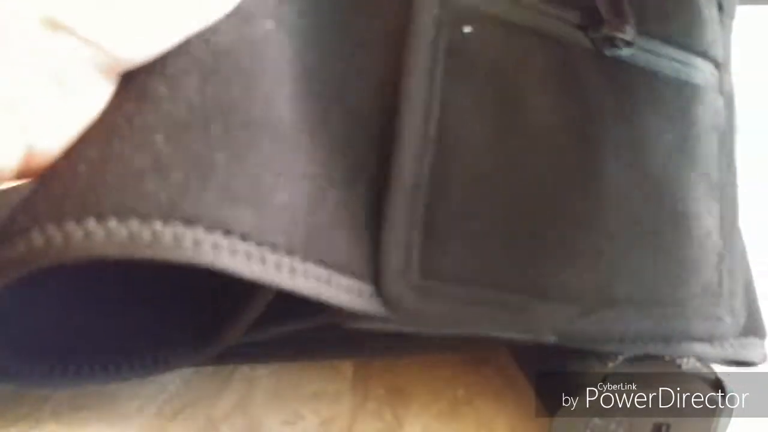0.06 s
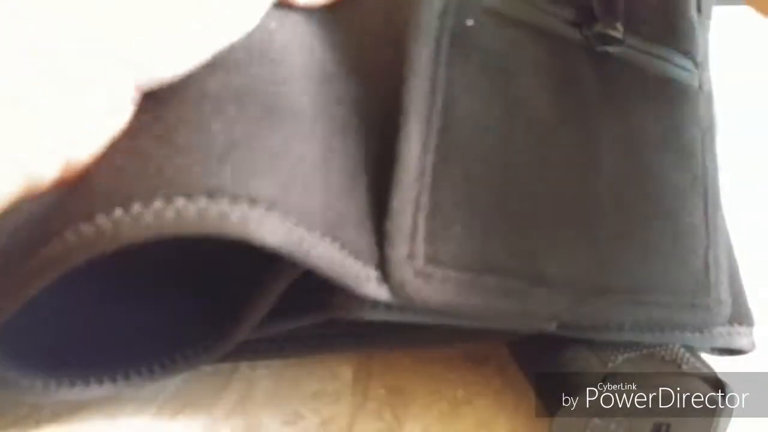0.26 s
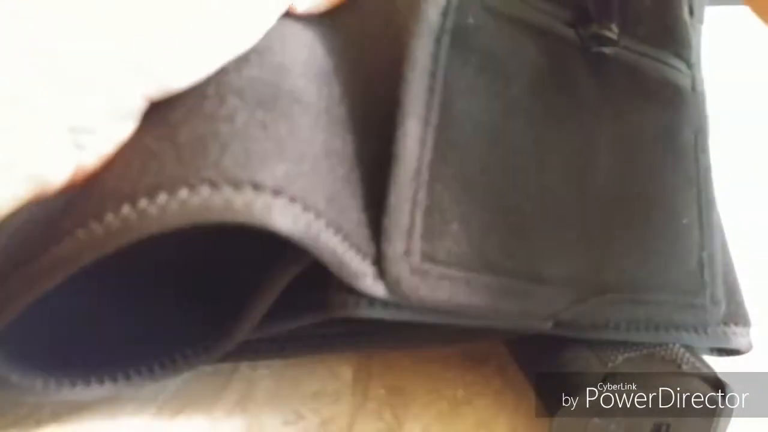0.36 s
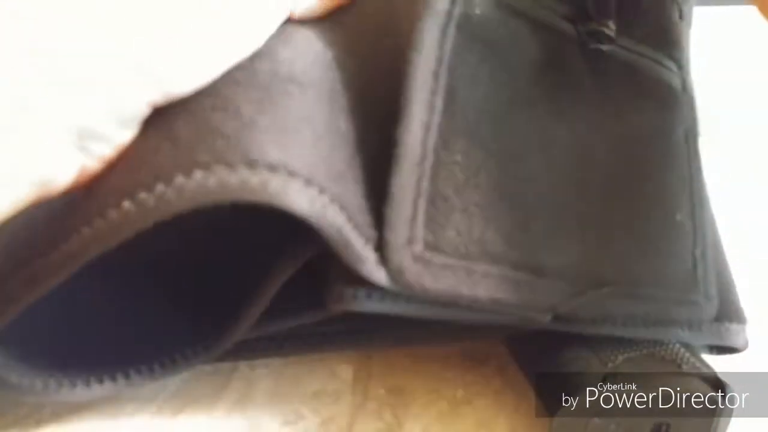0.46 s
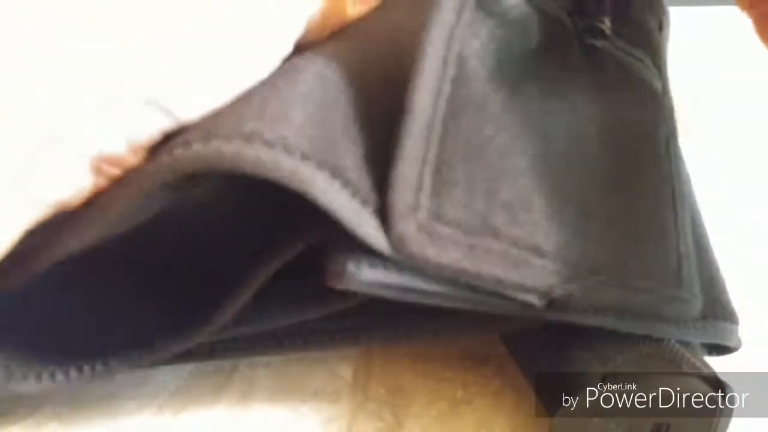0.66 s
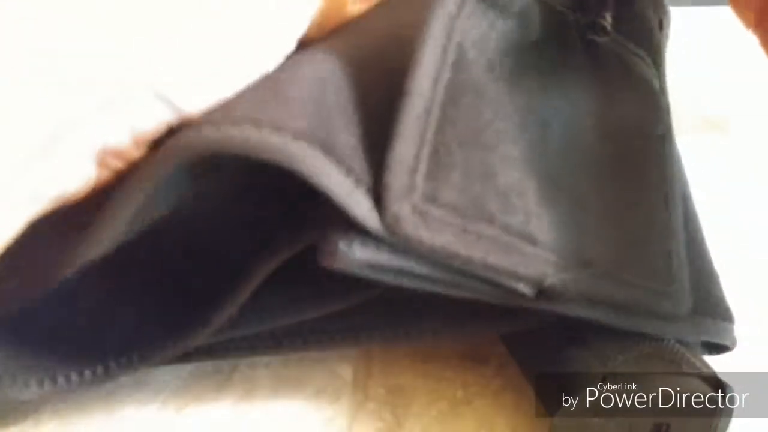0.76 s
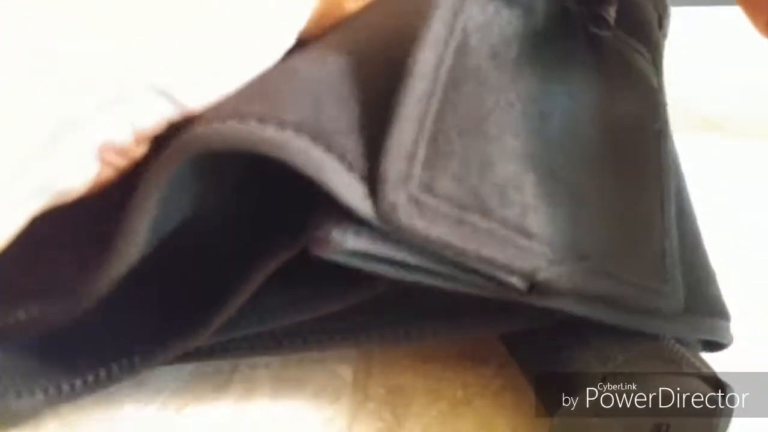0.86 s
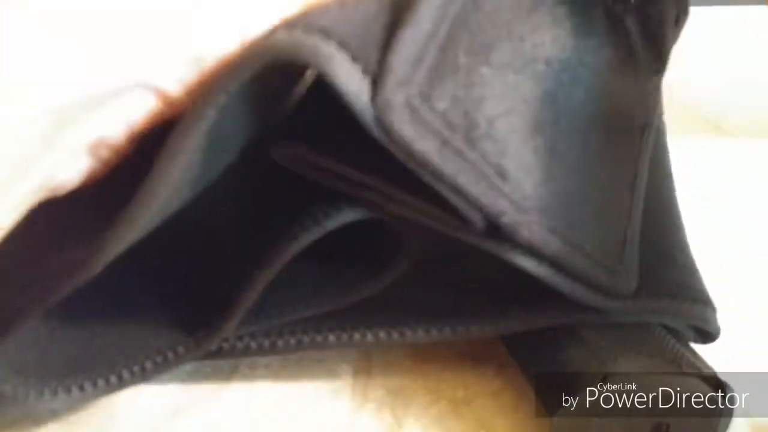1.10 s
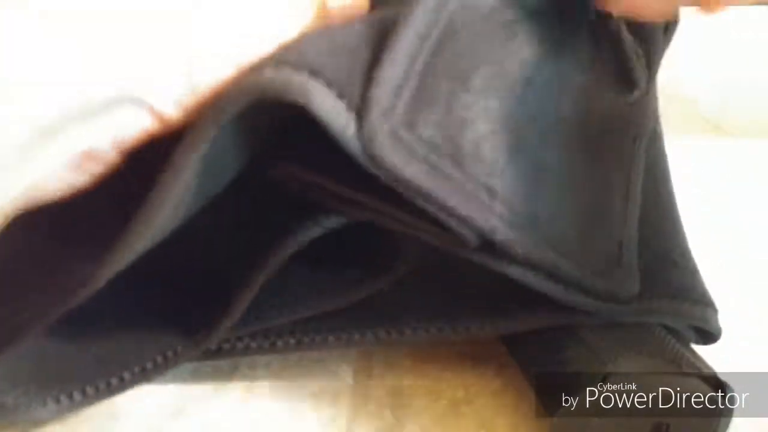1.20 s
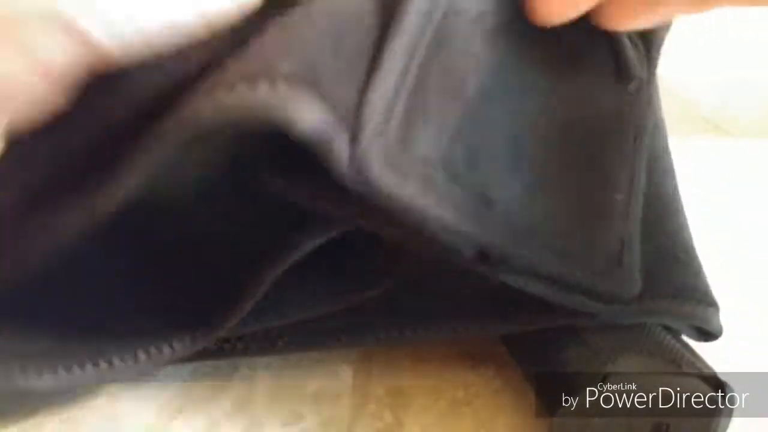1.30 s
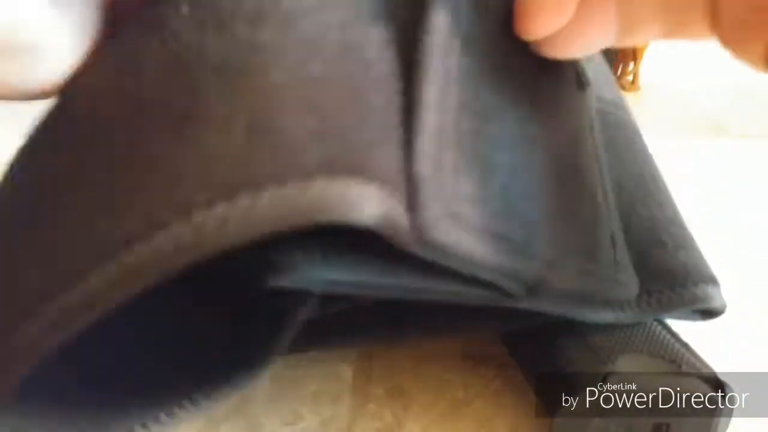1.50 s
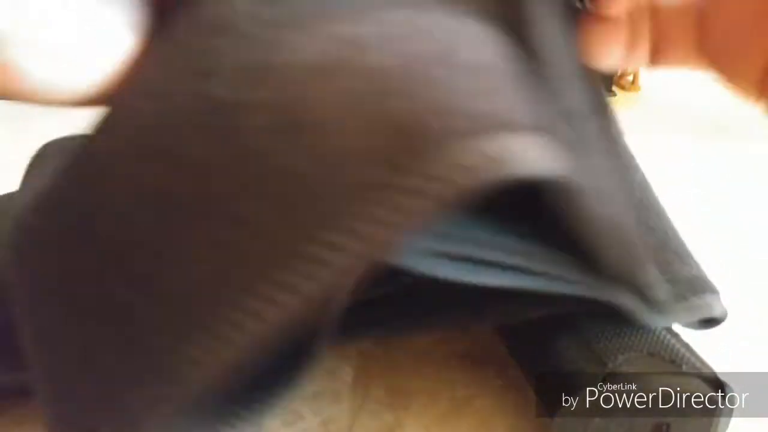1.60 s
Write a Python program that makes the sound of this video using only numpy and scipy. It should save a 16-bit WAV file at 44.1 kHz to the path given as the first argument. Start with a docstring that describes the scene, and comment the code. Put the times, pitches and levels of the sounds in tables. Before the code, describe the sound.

Loud crackling rip of a hook-and-loop strap peeled apart, then brief soft cloth rustling.

```python
"""A hook-and-loop strip on a padded fabric belt is peeled open indoors, close to a small stereo camera.
Thousands of hooks let go as short ringing noise bursts that jolt the stiff backing; louder snaps stand out.
Cloth rustles before and after as grainy coloured noise, a seam scrapes in narrow noise bands,
soft thuds ring the padding as decaying sines, and handling rumbles under them.
A decaying noise tail makes the room; a steady noise floor lies behind it all."""
import sys
import numpy as np
from scipy import signal
from scipy.fft import rfft, irfft, next_fast_len
from scipy.io import wavfile
from scipy.ndimage import map_coordinates

SR = 44100
rng = np.random.default_rng(int(sys.argv[2]) if len(sys.argv) > 2 else 0)


def pcm_store(signal):
    """Save signal as 16-bit PCM."""
    levels = np.round(np.clip(np.atleast_2d(signal), -1, 1) * 32767)
    wavfile.write(sys.argv[1], SR, levels.astype(np.int16).T)


def volts_from_decibels(level):
    """Turn decibel levels (scalar or array-like) into linear amplitude factors."""
    exponent = np.asarray(level, float) / 20
    return 10 ** exponent


N = 72765  # length in samples

# the right microphone hears later, by a fixed lag and a random spread per grain
LAG_S, LAG_SPREAD_S = 0.00015, 0.00009
# share of noise power that is independent at each microphone
UNALIKE, BACKING_UNALIKE = 0.52, 0.079


def unit(x):
    """Scale to rms 1."""
    return x / np.sqrt(np.mean(x ** 2) + 1e-20)


def along(points, hz):
    """Interpolate (frequency, value) points on a log frequency axis."""
    f, v = np.transpose(points)
    return np.interp(np.log(hz + 1), np.log(f + 1), v)


def curve(rows, column=1):
    """One table value per sample; -120 dB outside the table."""
    rows = np.array(rows)
    return np.interp(np.arange(N) / SR, rows[:, 0], rows[:, column], left=-120, right=-120)


def wobble(rate):
    """A smooth random curve with rate knots a second."""
    knots = rng.standard_normal(1000)
    return map_coordinates(knots, [np.clip(np.arange(N) * rate / SR, 0, 998)])


def coloured(x, spectrum):
    """Causal (minimum-phase) colour that keeps the rms of white noise; steep below the first point."""
    m = 2 * next_fast_len(N // 2 + 4096)
    hz = np.fft.rfftfreq(m, 1 / SR)
    low_cut = np.clip(hz / spectrum[0][0], 0, 1) ** 4
    gain = volts_from_decibels(along(spectrum, hz)) * low_cut
    # folding the cepstrum onto positive times gives the minimum phase
    cepstrum = irfft(np.log(unit(gain) + 1e-5), m)
    cepstrum[1:m // 2] *= 2
    cepstrum[m // 2 + 1:] = 0
    response = np.exp(rfft(cepstrum))
    return irfft(rfft(x, m) * response, m)[..., :N]


def scatter(s, shapes, pan_db, lag):
    """Place one stereo grain per row: pan_db lowers the left once and the right twice, the right lags."""
    out = []
    for side, start in enumerate((s, s + LAG_S + LAG_SPREAD_S * lag)):
        at = np.round(start * SR).astype(int)[:, None] + np.arange(shapes.shape[-1])
        grains = shapes[side] * volts_from_decibels((-1.0 - side) * pan_db)[:, None]
        out.append(np.bincount(np.clip(at, 0, N).ravel(), grains.ravel(), N + 1)[:N])
    return np.array(out)


def bursts(count, size, t60, unalike):
    """Dying noise bursts that mix a part shared by both microphones with a part of each one's own."""
    shared, left, right = np.moveaxis(rng.standard_normal((count, 3, size)), 1, 0)
    own_share = np.clip(unalike, 0, 1)
    noise = np.sqrt(1 - own_share) * shared + np.sqrt(own_share) * np.array([left, right])
    return noise * volts_from_decibels(-60 * np.arange(size) / SR / t60)


# the peel, close to the microphones: (time [s], hook level [dB], backing level over hooks [dB])
PEELING = [(0.08, -56, -21), (0.092, -43, -27), (0.106, -68, -35), (0.122, -27.5, -24), (0.156, -35.5, -14),
           (0.168, -24.5, -8), (0.178, -33, -35), (0.2, -37.5, -2.5), (0.212, -21, -6.5), (0.246, -26, -25),
           (0.27, -22.5, -16), (0.284, -33.5, -30), (0.31, -13.5, -10), (0.338, -30.5, -44),
           (0.348, -9.5, -9), (0.376, -18.5, -19.5), (0.386, -8.5, -13), (0.422, -44.5, -39),
           (0.434, -22.5, -20), (0.46, -20.5, -13.5), (0.468, -14.5, -16.5), (0.478, -22.5, -46),
           (0.49, -14.5, -13.5), (0.512, -17.5, -14.5), (0.608, -12.5, -16.5), (0.644, -19, -27),
           (0.658, -13.5, -15.5), (0.67, -17, -38), (0.688, -20, -32), (0.704, -25.5, -19),
           (0.738, -14, -21), (0.762, -27.5, -26), (0.8, -18, -41), (0.822, -35, -2), (0.828, -19, -31),
           (0.886, -25, -26), (0.896, -20.5, -19), (0.904, -22, -32), (0.908, -24, -21), (0.972, -9.5, -22),
           (0.978, -11.5, -22), (1.022, -6.5, -10), (1.044, -18.5, -44), (1.08, -31, -15),
           (1.12, -29.5, -10), (1.134, -24.5, -19), (1.14, -36, -5), (1.152, -15, -28), (1.168, -68, -6),
           (1.186, -49, -10), (1.19, -49, -12)]
# colour of hooks letting go, for single snaps too: (frequency [Hz], density [dB per Hz])
CRACKLE_COLOUR = [(710, -41), (1200, -16), (1310, -15), (1410, -18.5), (1570, -17.5), (1990, -17),
                  (2380, -8), (3150, -8), (4070, -7.5), (4730, -8.5), (5100, -4), (6740, -9), (9010, 1),
                  (10800, -12.5), (11800, -8), (13700, -9), (15600, -11.5)]
# colour of the shaken stiff backing, for single snaps too: (frequency [Hz], density [dB per Hz])
BACKING_COLOUR = [(180, -60), (300, -17.5), (402, -9.5), (685, 2), (1270, -2), (1420, -3), (1690, 2.5),
                  (2000, 1), (2600, -4), (4400, -120)]
CANDIDATES_PER_S, DENSER = 4400, 0.65  # hooks before thinning; dB of density per dB of pull
HOOK_T60_S, HOOK_HZ, HOOK_OCTAVES = 0.0038, 5000, 1.1  # burst decay; median ring pitch and its spread
RING_Q, RING_DB = 3.5, 1.5
SIZE_SPREAD_DB, PAN_SPREAD_DB = 3.8, 0.5
CLUMP_DB, CLUMPS_PER_S = 1.2, 150  # random swell of the grain level


def hooks():
    """Each hook cracks at a pitch of its own and jolts the backing; a harder pull frees more of them."""
    count, level = round(CANDIDATES_PER_S * N / SR), curve(PEELING)
    s = rng.uniform(0, (N - 1) / SR, count)
    chance = rng.uniform(0, 1, count)
    size, pitch, pan, lag = rng.standard_normal((4, count))
    density = volts_from_decibels(DENSER * (level - level.max()))
    share = np.clip(density[(s * SR).astype(int)], 0.15, 1)
    t = np.arange(256) / SR
    hz = np.clip(HOOK_HZ * 2 ** (HOOK_OCTAVES * pitch), 400, 16000)[:, None]
    ring = volts_from_decibels(RING_DB) * np.sin(2 * np.pi * hz * t) * np.exp(-np.pi * hz * t / RING_Q)
    # thinned by chance; fewer hooks are made larger to hold the power
    freed = (chance < share) / np.sqrt(share)
    gain = (volts_from_decibels(SIZE_SPREAD_DB * np.clip(size, -2, 2)) * freed)[:, None]
    clumps = volts_from_decibels(CLUMP_DB * wobble(CLUMPS_PER_S))
    crack_grains = gain * (bursts(count, len(t), HOOK_T60_S, UNALIKE) + ring)
    jolt_grains = gain * bursts(count, len(t), HOOK_T60_S, BACKING_UNALIKE)
    cracks = unit(clumps * scatter(s, crack_grains, PAN_SPREAD_DB * pan, lag))
    jolts = unit(clumps * scatter(s, jolt_grains, 0 * pan, lag))
    backing_level = level + curve(PEELING, column=2)
    return coloured(cracks * volts_from_decibels(level), CRACKLE_COLOUR) + coloured(jolts * volts_from_decibels(backing_level), BACKING_COLOUR)


# loud single snaps, levels and centre as set before panning and colour:
# (time [s], crack peak level [dB], centre frequency [Hz], backing jolt level [dB])
SINGLE_SNAPS = [(0.0901, -18, 6000, -41.5), (0.1242, -19, 9560, -24), (0.1454, -31, 8800, -27.5),
                (0.166, -32, 9360, -24), (0.1794, -24.5, 9420, -35), (0.2114, -25, 9600, -38),
                (0.2204, -17, 8820, -25), (0.261, -14, 9400, -27), (0.2674, -7.5, 3570, -18),
                (0.2724, -26, 8870, -32), (0.2884, -15, 8060, -34), (0.3015, -4, 8880, -21),
                (0.3124, -11, 9110, -33), (0.3254, -9, 8850, -23), (0.3461, -12, 9080, -22),
                (0.3521, 1.5, 9300, -29), (0.3588, -3, 9200, -35), (0.3652, 0.5, 9400, -23),
                (0.3774, -4, 9200, -30), (0.3844, -8, 7650, -21), (0.3994, -5.5, 8750, -27),
                (0.4342, -4, 9400, -45), (0.4444, -5, 9050, -37), (0.4673, -6, 8900, -47),
                (0.4893, -3, 8970, -20), (0.5523, -6, 9360, -32), (0.5611, -5, 8500, -21),
                (0.5914, -1.5, 9200, -17.5), (0.6543, -28, 8900, -45), (0.6684, -5, 9130, -43),
                (0.6794, -8, 8940, -38), (0.7726, -6, 9040, -36), (0.7913, -6, 9200, -37),
                (0.7973, -9, 8940, -39), (0.8088, -8, 9000, -28.5), (0.8282, 0, 6740, -37),
                (0.835, -7, 9580, -34), (0.8939, -2, 9000, -42.5), (0.9111, -4, 9200, -44),
                (0.9257, 2.5, 9200, -41), (0.9338, -9, 8900, -38), (0.9532, 4.5, 9150, -32),
                (0.9689, 4, 9650, -21), (1.0374, 0, 9200, -37), (1.1019, -4, 3130, -42),
                (1.1244, -16, 9610, -35), (1.1338, -3, 8400, -36), (1.1464, -5, 5700, -33),
                (1.1514, -27, 8140, -44), (1.181, -15.5, 8200, -49), (1.2207, -22.5, 6310, -63),
                (1.2322, -11, 6600, -62), (1.2963, -32, 8660, -55), (1.4311, -24, 8960, -40.5),
                (1.504, -41, 9300, -55), (1.6103, -14, 4020, -40)]
SNAP_T60_S, SNAP_Q, SNAP_BROAD_DB = 0.008, 1.1, -16  # decay; resonance; broadband part
SNAP_PAN_DB = 2  # 2 dB down on the left, 4 dB on the right


def snaps():
    """Bunches of hooks that break free at once, each a noise burst with its own brightness."""
    s, db, hz, jolt_db = np.transpose(SINGLE_SNAPS)
    size, still = 900, np.zeros(len(s))
    f, centre = np.fft.rfftfreq(size, 1 / SR), hz[:, None]
    damping = 1j * f * centre / SNAP_Q
    resonance = (damping / (centre * centre - f * f + damping)) ** 2 + volts_from_decibels(SNAP_BROAD_DB)
    cracks = irfft(rfft(bursts(len(s), size, SNAP_T60_S, UNALIKE)) * resonance, size)
    peak = np.abs(cracks).max(axis=(0, 2))[:, None]
    cracks = cracks / peak * volts_from_decibels(db)[:, None]
    jolts = bursts(len(s), size, SNAP_T60_S, BACKING_UNALIKE) * volts_from_decibels(jolt_db)[:, None]
    cracks = scatter(s, cracks, still + SNAP_PAN_DB, still)
    jolts = scatter(s, jolts, still, still)
    return coloured(cracks, CRACKLE_COLOUR) + coloured(jolts, BACKING_COLOUR)


# belt cloth moving before and after the peel, one list each: (time [s], level [dB])
RUSTLING = [
    [(0.0, -45), (0.04, -48), (0.046, -45.5), (0.062, -43.5), (0.076, -42), (0.082, -59), (0.088, -57),
     (0.092, -40), (0.1, -49), (0.112, -50), (0.12, -50)],
    [(1.17, -55), (1.184, -38), (1.192, -55), (1.216, -52), (1.234, -43), (1.244, -54), (1.256, -41),
     (1.28, -57), (1.314, -26), (1.35, -40.5), (1.4, -45), (1.43, -42), (1.456, -59.5), (1.538, -53),
     (1.616, -36.5), (1.65, -32)],
]
# colour of the cloth: (frequency [Hz], density [dB per Hz])
CLOTH_COLOUR = [(260, -26), (450, -16.5), (579, -23), (672, -10), (987, -49), (1200, -3.5), (1370, -12.5),
                (2910, 2), (3180, -3), (5190, 0.5), (6020, -4.5), (9260, 5), (10900, -9.5), (13800, -3),
                (15600, -15)]


def cloth():
    """Fabric slides on fabric: noise whose level flutters quickly, heard as grainy hiss."""
    level = sum(volts_from_decibels(curve(rows)) for rows in RUSTLING)
    grain = volts_from_decibels(2.5 * wobble(300) + wobble(40))
    hiss = unit(bursts(1, N, np.inf, UNALIKE)[:, 0] * grain)
    return coloured(hiss * level, CLOTH_COLOUR)


# scrapes on a stiff seam: (time [s], level before the swell [dB], centre frequency [Hz])
SEAM_SCRAPES = [(1.306, -24.5, 2940), (1.309, -37, 2460), (1.321, -29, 2900)]
SEAM_S, SEAM_WIDTH_HZ = 0.013, 350


def seam():
    """A scraped stiff seam sounds in narrow bands of noise that swell and fade."""
    out, size = np.zeros((2, N)), round(SEAM_S * SR)
    for s, db, hz in SEAM_SCRAPES:
        b, a = signal.iirpeak(hz, hz / SEAM_WIDTH_HZ, SR)
        band = signal.lfilter(b, a, rng.standard_normal((2, SR // 10)))
        out[:, round(s * SR):][:, :size] += volts_from_decibels(db) * unit(band)[:, -size:] * np.hanning(size)
    return out


# soft thuds through the padding: (time [s], level [dB])
PADDING_THUDS = [(0.086, -37), (0.826, -49), (1.126, -47), (1.201, -36), (1.215, -56), (1.319, -49),
                 (1.462, -42), (1.551, -38), (1.561, -42)]
# ringing modes of the padding: (frequency [Hz], level in a thud [dB], t60 [s])
PADDING_MODES = [(145, -8, 0.1), (278, -2, .06), (335, -7.5, 0.053)]


def padding():
    """Each soft thud rings the padding's low modes, with a rounded onset."""
    out, t = np.zeros(N + SR), np.arange(SR // 4) / SR
    onset = 1 - np.exp(-t / 0.0017)
    for s, db in PADDING_THUDS:
        ring = sum(volts_from_decibels(g - 60 * t / t60) * np.sin(2 * np.pi * hz * t) for hz, g, t60 in PADDING_MODES)
        out[round(s * SR):][:len(t)] += volts_from_decibels(db) * ring * onset
    return out[:N]


# handling, under the thuds: (time [s], deep rumble level [dB], upper rumble level [dB])
HANDLING_LEVELS = [(0.0, -48, -55), (0.064, -72, -78), (0.086, -60, -59.5), (0.238, -59, -55.5),
                   (0.266, -67, -60), (0.334, -53, -61), (0.362, -56, -49.5), (0.444, -62, -60.5),
                   (0.602, -55.5, -47), (0.688, -61, -61.5), (0.73, -59, -51.5), (0.784, -72, -66),
                   (0.836, -55, -54), (0.868, -63, -57.5), (0.936, -62, -57), (0.96, -52, -34.5),
                   (1.024, -34.5, -39), (1.08, -68, -54.5), (1.134, -42, -47.5), (1.184, -67, -66),
                   (1.208, -67, -52), (1.276, -74, -60.5), (1.328, -49, -72), (1.368, -75, -74),
                   (1.438, -67, -72), (1.466, -63, -60), (1.498, -69, -59.5), (1.562, -51, -50),
                   (1.598, -62, -55), (1.65, -57, -58)]
# colours of its deep and upper parts: (frequency [Hz], density [dB per Hz])
DEEP_COLOUR = [(21, -40), (35, -5), (59, 1), (124, 1), (170, -5), (220, -31), (370, -120)]
UPPER_COLOUR = [(100, -35.5), (170, -7), (280, -5), (365, -7), (444, -15), (650, -6.5), (840, -36),
                (1430, -120)]


def handling():
    """Handling rumbles in two bands of low noise, nearly alike at both microphones."""
    deep = unit(coloured(bursts(1, N, np.inf, 0.1)[:, 0], DEEP_COLOUR)) * volts_from_decibels(curve(HANDLING_LEVELS))
    upper = unit(coloured(bursts(1, N, np.inf, 0.058)[:, 0], UPPER_COLOUR))
    upper = upper * volts_from_decibels(curve(HANDLING_LEVELS, column=2))
    return deep * volts_from_decibels([[0.8], [-0.8]]) + upper  # the deep part leans left


# decay of the room indoors: (frequency [Hz], t60 [s])
ROOM_DECAY = [(300, 0.13), (3000, 0.27), (12000, 0.13)]
ROOM_DB = -9.5


def room(x):
    """The room's tail: noise that dies at its own pace in each band, slowest around 3 kHz."""
    hz, t, z = signal.stft(rng.standard_normal((2, SR // 2)), SR, nperseg=256)
    decay = volts_from_decibels(-60 * t / along(ROOM_DECAY, hz)[:, None])
    tail = signal.istft(z * decay, SR, nperseg=256)[1]
    tail = tail / np.linalg.norm(tail[0])
    return volts_from_decibels(ROOM_DB) * signal.fftconvolve(x, tail, axes=1)[:, :N]


# colour of the steady background air: (frequency [Hz], density [dB per Hz])
FLOOR_COLOUR = [(24, -41), (40, 4), (287, -4), (951, -3), (3230, -13), (4360, -44), (12100, -11),
                (14400, -35), (15600, -28)]
FLOOR_DB = -62


def air():
    """Steady background noise, independent at the two microphones."""
    return volts_from_decibels(FLOOR_DB) * coloured(rng.standard_normal((2, N)), FLOOR_COLOUR)


def scene():
    """The close belt with its room tail, then padding, handling and air."""
    belt = hooks() + snaps() + cloth() + seam()
    return belt + room(belt) + padding() + handling() + air()


def top_cut(x):
    """Nothing passes above the cut-off."""
    return signal.sosfilt(signal.butter(12, 15710, fs=SR, output="sos"), x)


LEFT_DB, KNEE, TOP_HZ = -0.14, 12, 15450  # left trim, right opposite; clip hardness; band limit


def record(dry):
    """The microphones differ a little in level; the loudest cracks clip; a band limit cuts the top."""
    x = dry * volts_from_decibels([[LEFT_DB], [-LEFT_DB]])
    x = x / (1 + np.abs(x) ** KNEE) ** (1 / KNEE)
    passed = np.fft.rfftfreq(N + 1, 1 / SR) < TOP_HZ
    mix = irfft(rfft(x, N + 1) * passed, N + 1)[:, :N]
    return top_cut(mix)


dry = scene()
out = record(dry)
pcm_store(out)
```